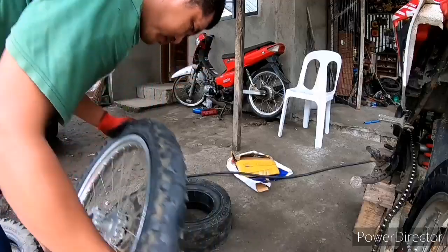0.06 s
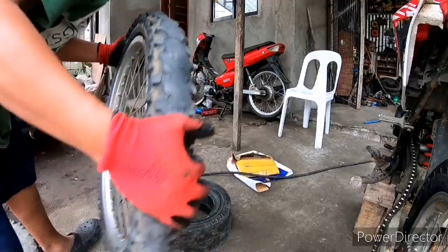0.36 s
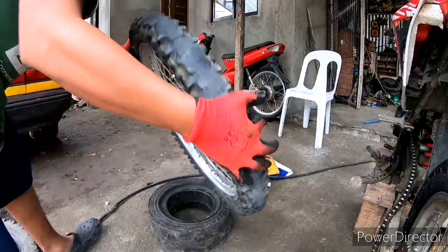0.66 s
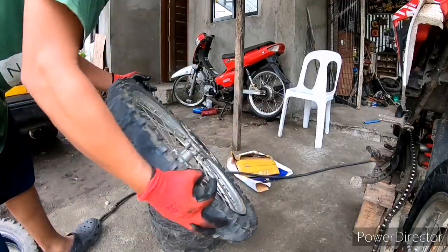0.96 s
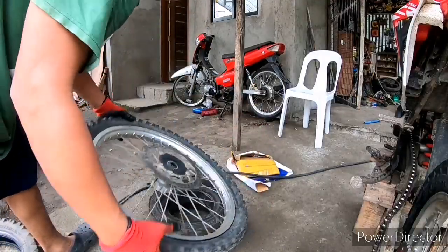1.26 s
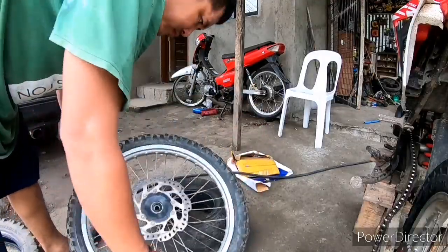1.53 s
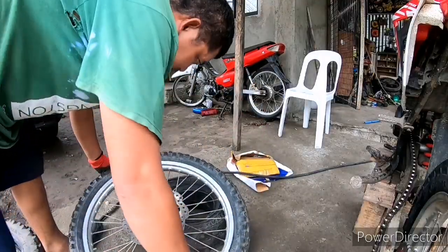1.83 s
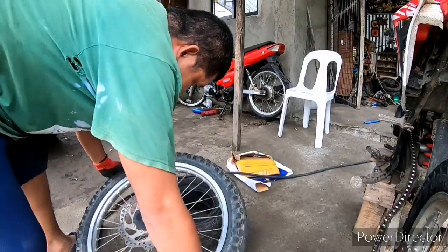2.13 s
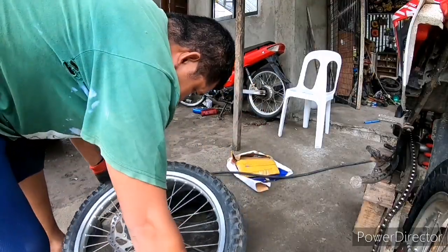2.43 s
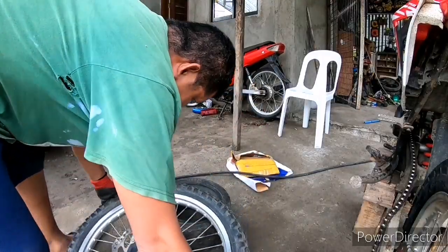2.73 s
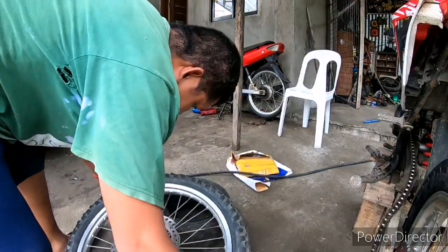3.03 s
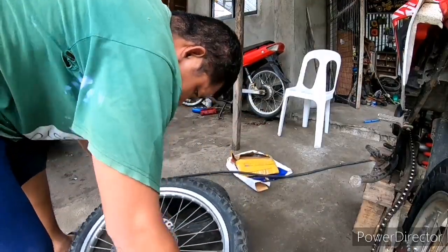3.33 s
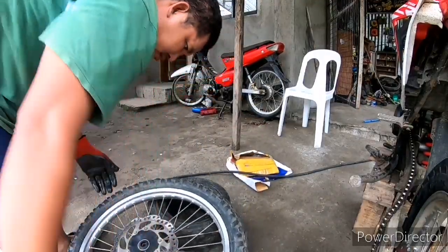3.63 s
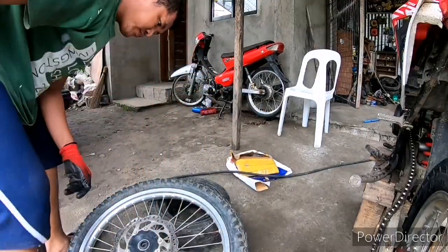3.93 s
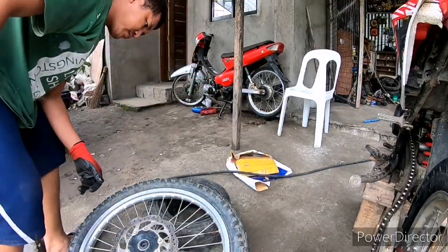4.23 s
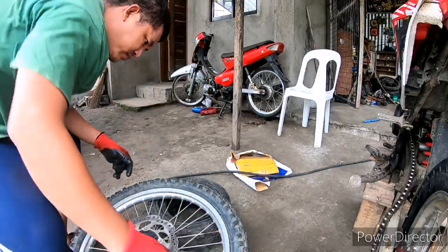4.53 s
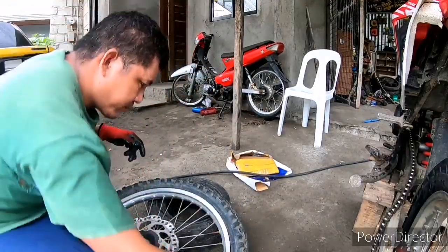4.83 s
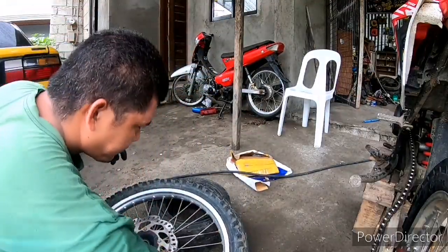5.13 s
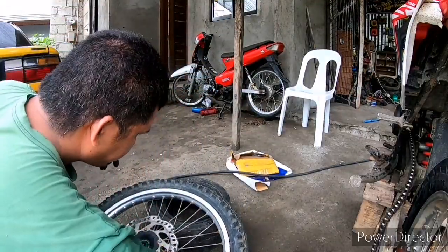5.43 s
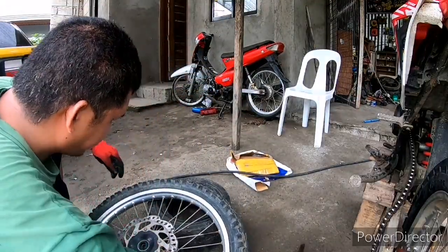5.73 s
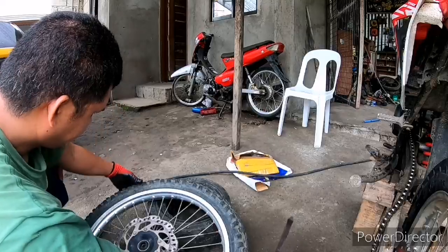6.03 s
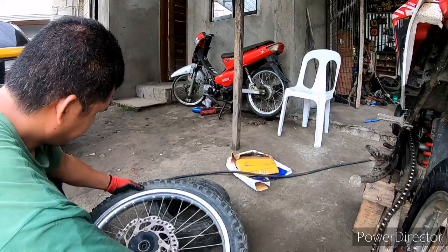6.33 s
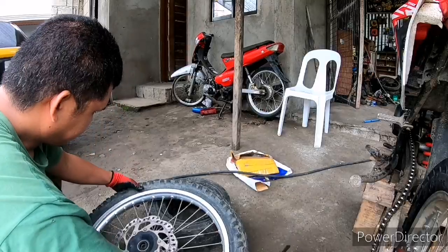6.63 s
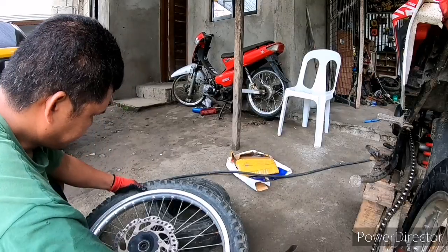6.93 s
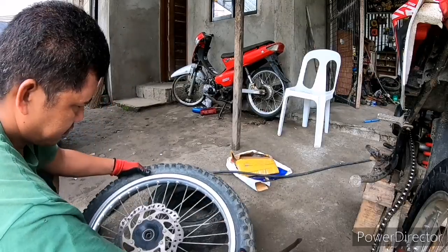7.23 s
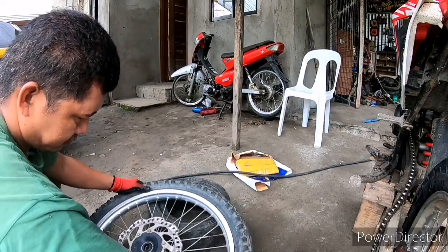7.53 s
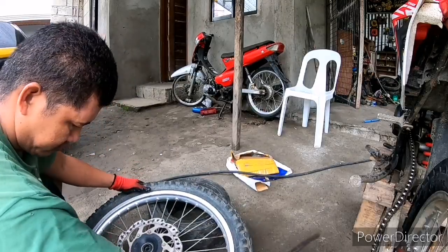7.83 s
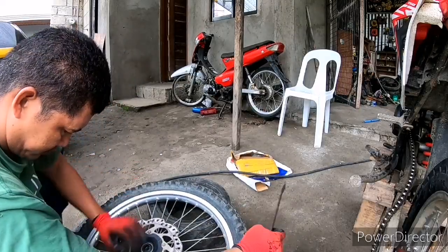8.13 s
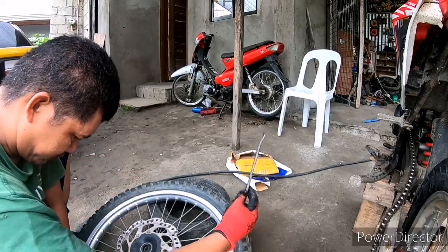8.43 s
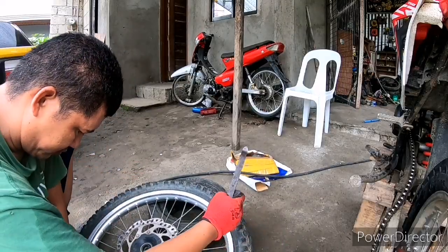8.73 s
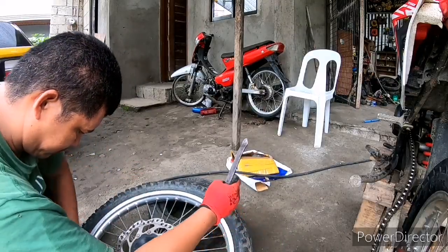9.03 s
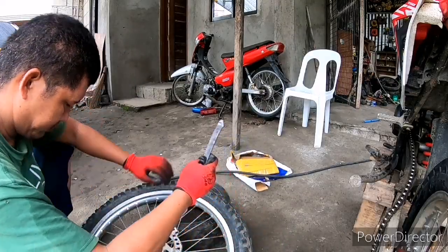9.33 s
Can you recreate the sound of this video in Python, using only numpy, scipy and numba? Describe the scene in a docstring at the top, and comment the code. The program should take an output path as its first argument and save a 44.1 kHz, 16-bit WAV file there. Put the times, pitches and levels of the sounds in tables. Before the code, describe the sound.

Steel tire levers ring on a motorcycle wheel's rim and brake disc over a thumping idle that slowly fades.

```python
"""Tire levers in a workshop yard

A motorcycle wheel is laid down between concrete walls, before a stereo microphone. Steel tire levers
are picked up and clink and slide on its rim and brake disc, each contact ringing the metal's modes.
Close by, a single-cylinder engine thumps through its silencer at idle, then speeds up a little and
fades, while street hiss and a light ticking grow in the background."""
import sys
import numpy as np
from scipy import signal
from scipy.fft import rfft, irfft, next_fast_len
from scipy.io import wavfile
from scipy.ndimage import uniform_filter1d, map_coordinates
from numba import njit

SR = 44100
rng = np.random.default_rng(int(sys.argv[2]) if len(sys.argv) > 2 else 0)


def master_out(mix):
    """Clip the mix to full scale and print it as 16-bit PCM to the path in sys.argv[1]."""
    frames = np.transpose(np.atleast_2d(mix))
    ceiling = np.clip(frames, -1, 1)
    pcm = np.round(ceiling * 32767).astype(np.int16)
    wavfile.write(sys.argv[1], SR, pcm)


N = 413658

# modes of a free lever: f/Hz, level/dB, t60/s, left minus right/dB
LEVER_MODES = [(1945, -3, .5, 0), (3160, -3, .12, -3), (3483, -1, .24, -2.5), (4601, 2.5, .24, -4),
               (5885, -6, .75, -8), (6257, 2, .25, -15), (8051, 3, .19, 0), (8856, -14, .5, -4),
               (9303, -16, .39, 4), (9820, -15, .3, -8), (10104, -10, .42, -8), (11900, -17, .4, -8),
               (12250, -18, .35, -8), (13900, -12, .35, -10), (14320, -14, .35, -6)]
# blows: t/s, ring/dB, band centre/Hz, spread/octaves, scuff/dB
LEVER_BLOWS = [(1.781, -35.5, 2000, .3, -55), (1.786, -33, 3900, .45, -56), (1.857, -43, 7000, .7, -41),
               (1.880, -22.5, 7900, .36, -33), (1.884, -24.5, 4600, .22, -41), (1.931, -25, 6200, .12, -40),
               (1.966, -33, 9300, .12, -44), (1.978, -39, 4600, .9, -31), (2.000, -45, 6500, .4, -37),
               (2.036, -34, 6400, .1, -50), (3.199, -28, 9820, .02, -58)]
# slides: t/s, length/s, ring/dB, band centre/Hz, spread/octaves, scuff/dB
LEVER_SCRAPES = [(1.675, .07, -42.5, 3520, .14, -60), (1.775, .09, -45, 6000, .6, -51),
                 (1.87, .1, -42, 6050, .2, -42), (1.87, .12, -41, 3100, .12, -46),
                 (2.0, .135, -47, 5000, .45, -51), (6.96, .3, -49, 10200, .1, -72)]


def lever():
    """Steel tire levers clink and ring brightly, mostly right of the microphone."""
    return struck(LEVER_MODES, LEVER_BLOWS + chatter(LEVER_SCRAPES), scuff_t60=.21,
                  waver_db=2.3, drift_rad=.35, scuff_lean_db=-4, port_rad=.35)


# modes, blows and slides of a gripped lever: columns as for the free lever
HELD_MODES = [(2915, -6, .09, -2), (3112, -2, .11, -2), (3365, 2, .14, -3), (4590, 2, .2, -3),
              (5930, -7, .2, -10), (6270, 0, .2, -12), (8080, 1, .2, -3), (8856, -12, .16, -10),
              (9303, -13, .16, 4), (9750, -14, .16, -8), (10200, -13, .16, -14), (12250, -14, .16, -8)]
HELD_BLOWS = [(5.663, -36.5, 6000, .9, -35), (5.678, -46, 6000, .7, -41)]
HELD_SCRAPES = [(5.505, .09, -53, 5200, .3, -56), (5.61, .055, -52, 3350, .15, -59),
                (5.66, .055, -41, 3080, .12, -46), (5.685, .04, -42, 4560, .1, -52),
                (5.665, .06, -41, 6200, .14, -44)]
# its pitch: t/s, bend/percent
HELD_BEND = [(5.52, 1.9), (5.59, 1.1), (5.65, -0.22), (5.70, -0.62), (5.76, -0.7)]


def held_lever():
    """A lever damped by the glove rings briefly; its pitch sinks as it is pressed home."""
    return struck(HELD_MODES, HELD_BLOWS + chatter(HELD_SCRAPES), scuff_t60=.12, waver_db=3.5,
                  drift_rad=1.3, scuff_lean_db=-5, port_rad=.75, bend_percent=curves(HELD_BEND)[0])


# modes, blows and slides of the brake disc: columns as for the free lever
DISC_MODES = [(2680, -1.5, .3, -1), (2980, 0, .14, -4), (3200, 1, .2, -2), (3345, -6, .15, -4),
              (3521, -13, .3, 0), (3815, -3, .27, 4), (4204, -7, .18, 0), (4689, -7, .3, 2),
              (5033, -4, .2, -2), (5523, -4, .14, -8), (6056, -13, .2, -9), (6693, 1, .25, -24),
              (9670, -4, .3, -14), (10390, -7, .25, -12), (14340, -6, .25, -3)]
DISC_BLOWS = [(2.8918, -28, 4600, .6, -19.5), (2.897, -30.5, 3120, 0.27, -20.5),
              (3.284, -33.5, 3310, 0.095, -42), (3.377, -42, 3330, 0.06, -44)]
DISC_SCRAPES = [(2.895, .045, -37, 7400, .27, -54), (3.17, .08, -55, 3130, .05, -60),
                (3.16, .08, -60, 6693, .1, -66), (7.305, .05, -44.5, 2690, .05, -64),
                (7.35, .035, -43, 4204, .04, -54), (7.33, .09, -56, 9300, .35, -62),
                (7.555, .085, -59, 3200, .22, -44)]


def brake_disc():
    """The steel plate chimes in closely spaced modes under the lever."""
    return struck(DISC_MODES, DISC_BLOWS + chatter(DISC_SCRAPES), scuff_t60=.2,
                  waver_db=2.2, drift_rad=.7, scuff_lean_db=-3, port_rad=-.48)


# modes, blows and slides of the rim: columns as for the free lever
RIM_MODES = [(813, 11, 0.081, 2), (1283, 10.5, 0.1, -5), (1600, 3, 0.075, -4.5), (1830, -10.5, 0.042, -8),
             (2440, -3.5, 0.045, 0.5), (3490, 3, 0.035, 0), (5060, 4.5, 0.025, -10), (6160, 2, 0.029, -28),
             (8260, -3.5, 0.051, -12), (9700, -8.5, .04, -10)]
RIM_BLOWS = [(0.338, -65.5, 6450, 0.28, -36), (0.706, -60, 1200, 0.78, -43), (1.294, -49.5, 2370, 1.6, -36),
             (1.631, -25.5, 4600, 1.04, -29), (1.653, -65, 1590, 0.57, -33.5),
             (1.779, -65, 1290, 0.79, -23.5), (2.847, -47, 4970, 0.8, -38), (2.862, -45, 6000, 1, -44),
             (3.198, -59, 4000, 2.1, -42.5), (3.285, -60, 3500, 0.63, -42)]
RIM_SCRAPES = [(1.88, .12, -55, 1500, .8, -43), (2.848, .075, -54, 1400, .55, -36),
               (7.34, .055, -64, 1700, 1.3, -40), (7.65, .08, -64, 1400, .98, -45)]


def rim():
    """The rim clanks: its modes start lower and die quickly."""
    return struck(RIM_MODES, RIM_BLOWS + chatter(RIM_SCRAPES), scuff_t60=.16,
                  waver_db=4, drift_rad=.72, scuff_lean_db=-3.5, port_rad=.9)


# modes and blows of the hub: columns as for the free lever
HUB_MODES = [(803, 0, .07, 0), (1050, -3, .05, 0), (1406, -4, .029, 0), (1490, -3, .076, 0),
             (1757, 4.5, .045, .6), (1890, -1, .04, 0)]
HUB_BLOWS = [(2.847, -21, 1910, 0.36, -39), (2.8707, -25, 1770, 0.64, -23), (2.879, -31, 1180, 0.46, -18),
             (2.903, -30, 1180, 0.41, -30), (2.915, -23.5, 1430, 0.1, -28.5)]


def hub():
    """A quick cluster of blows on well-damped modes makes one dull clatter."""
    return struck(HUB_MODES, HUB_BLOWS, scuff_t60=.062,
                  waver_db=3, drift_rad=.81, scuff_lean_db=1.5, port_rad=2)


def struck(modes, hits, scuff_t60, waver_db, drift_rad, scuff_lean_db, port_rad, bend_percent=0):
    """Contacts feed energy into a steel part's modes; where and how hard they touch selects the band."""
    starts, ring_db, centre_hz, spread, _ = np.transpose(hits)
    onsets = np.round(starts * SR).astype(int)
    ports = np.array([[.5], [-.5]]) * port_rad  # phase at the two microphone ports
    t, out = np.arange(N) / SR, np.zeros((2, N))
    bent_time = t + np.cumsum(bend_percent * np.ones(N)) / (100 * SR)
    for hz, db, t60, lean_db in modes:
        fed = np.bincount(onsets, (amp(ring_db + db) * band(hz, centre_hz, spread)) ** 2, N)
        energy = signal.lfilter([1], [1, -amp(-120 / (t60 * SR))], fed + 1e-20)
        live = np.flatnonzero(energy > 1e-11)
        envelope = uniform_filter1d(np.sqrt(energy), size=64)[live]
        # the shifting grip makes each ring waver in level and phase
        phase = 2 * np.pi * hz * bent_time[live] + drift_rad * wobble(70, live)
        waver = amp(waver_db * wobble(45, live))
        out[:, live] += envelope * waver * np.sin(phase + ports) * panned(lean_db)
    age, lead_samples = t[:SR // 5], 64
    for start, _, centre, octaves, db in hits:
        # the scuff: a sharp crack, then a short wash of dense high modes
        noise = rng.standard_normal(len(age)) + .25 * rng.standard_normal((2, len(age)))
        fade = amp(-60 * age / .027) + .25 * amp(-60 * age / scuff_t60)
        burst = np.pad(noise * fade, ((0, 0), (lead_samples, 0)))
        rolloff = lambda hz: lowpass(hz, 9800, 14) / np.sqrt(1 + hz / centre)
        colour = lambda hz: np.exp(1j * ports) * band(hz, centre, octaves) * rolloff(hz)
        scuff = filtered(burst, colour) / filtered(noise, colour).std()
        add(out, start - lead_samples / SR, amp(db) * scuff * panned(scuff_lean_db))
    return out


def chatter(slides, scatter_db=3.2, count=13):
    """Sliding steel sticks and slips: a run of light, uneven contacts that swells and fades."""
    contacts = []
    for start, length, ring_db, hz, spread, scuff_db in slides:
        progress = (np.arange(count) + rng.random(count)) / count
        swell_db = 20 * np.log10(np.sin(np.pi * progress) + 1e-6)
        sizes_db = swell_db + scatter_db * rng.standard_normal(count)
        for when, db in zip(start + length * progress, sizes_db):
            contacts.append((when, ring_db + db, hz, spread, scuff_db + db))
    return contacts


# the tire meets the ground: t/s, level/dB, f/Hz
TIRE_BUMPS = [(1.634, -15.5, 233), (3.285, -24, 212)]


def tire_thuds(t60=.17, attack_s=.0019):
    """The air-filled rubber gives one short low note at each bump."""
    out, t = np.zeros(N), np.arange(SR // 4) / SR
    for start, db, hz in TIRE_BUMPS:
        envelope = amp(db - 60 * t / t60) * (1 - np.exp(-t / attack_s))
        add(out, start, envelope * np.sin(2 * np.pi * hz * t))
    return out


# soft rubs: middle t/s, half length/s, band centre/Hz, spread/octaves, level/dB
RUB_STROKES = [(4.343, 0.013, 7000, 0.59, -55), (4.433, .04, 1900, .6, -51), (4.533, .028, 3280, 0.35, -49),
               (7.541, 0.02, 1290, 0.39, -44), (7.583, 0.027, 5500, 0.78, -45.5),
               (7.696, 0.072, 1990, 1.34, -47.5)]


def rubs(grain_db=3):
    """Grainy friction of glove, sandal and tire swells and fades without a blow."""
    out, t = np.zeros(N), np.arange(-SR // 4, SR // 4) / SR
    for middle, half, centre, spread, db in RUB_STROKES:
        noise = rng.standard_normal(len(t))
        grain = amp(grain_db * unit(uniform_filter1d(rng.standard_normal(len(t)), size=128)))
        friction = filtered(noise * grain, lambda hz: band(hz, centre, spread) * lowpass(hz, 9500, 14))
        add(out, middle + t[0], amp(db) * bell(t, half) * unit(friction))
    return out


# engine speed: t/s, firing rate/Hz
FIRING_RATE = [(0.0, 22.28), (0.4, 22.32), (1.2, 23.11), (2.4, 23.31), (2.9, 23.64), (4.0, 23.78),
               (4.55, 23.56), (5.5, 24.15), (7.25, 26.14), (8.55, 28.89), (8.9, 28.97), (9.38, 30.14)]


def engine():
    """One cylinder, close by: the exhaust valve barks, then the silencer's low harmonics swell."""
    speed, = curves(FIRING_RATE)
    cycles = np.cumsum(speed) / SR
    boom = silencer_boom(cycles, speed)
    barks = exhaust_barks(cycles, speed)
    # wall echoes fill the gaps between barks and widen the engine a little
    barks = reflected(.69 * barks + .43 * yard(barks[None])[0])
    side = yard((amp(-30) * boom + amp(-22) * barks)[None])[0]
    return (amp(-2) * boom + barks) * panned(-.18) + np.array([side, -side])


# the exhaust's low note: t/s, relative level/dB, centre of a lifted band/Hz, lift/dB
BOOM_COURSE = [(0, -31, 96.3, 14.5), (.45, -23, 124.5, 2.5), (.9, -27, 136.6, 11), (1.5, -30.5, 162.6, 19),
               (2.1, -29.5, 168, 15), (2.8, -35, 139.4, 7.5), (3.25, -28.5, 161, 11.5),
               (3.7, -29, 154.5, 7), (4.35, -26, 144, 7), (5.2, -25.5, 162.6, 9.5), (6.2, -24, 185, 1),
               (7.1, -27.5, 184, 2.5), (7.7, -28, 152, 9.5), (8.6, -32, 158, 12.5), (9.38, -39.5, 178, 15)]
# the silencer's low response: f/Hz, gain/dB
SILENCER_RESPONSE = [(45, -20.5), (68, -30.5), (90, 4.5), (115, 2), (165, -6.5), (185, -10), (215, -36)]


def silencer_boom(cycles, speed, lag_cycles=.1793, waver_db=1.5, lift_width_hz=10.5, dispersion_rad=.49):
    """Harmonics 2 to 8 of the firing rate add up to a thump; the higher ones run ahead and smear it."""
    level_db, lift_hz, lift_db = curves(BOOM_COURSE)
    boom = np.zeros(N)
    for order in range(2, 9):
        hz = order * speed
        db = level_db + along(SILENCER_RESPONSE, hz) + lift_db * bell(hz - lift_hz, lift_width_hz)
        phase = 2 * np.pi * order * (cycles - lag_cycles) + dispersion_rad * (order - 4) * (order - 5)
        boom += np.sqrt(2) * amp(db + waver_db * wobble(14)) * np.cos(phase)
    return boom


# the exhaust's bark: t/s, relative level/dB, strongest band/Hz
BARK_COURSE = [(0, -32, 377), (1.4, -40, 351), (2.1, -40.5, 362), (2.9, -37.5, 398), (3.7, -31.5, 361.6),
               (4.9, -33.5, 377), (5.8, -39.5, 355), (7.3, -41, 393), (9.38, -54.5, 381)]
# resonances of the silencer and of the pipe: f/Hz, width/Hz, gain/dB
SILENCER_MODES = [(194, 29, -0.5), (236.4, 61, -1), (279.4, 57.4, 1)]
PIPE_MODES = [(491, 28, 13.5), (566, 150, -16.5)]
JITTER_CYCLES = .005  # unevenness of the firings


def exhaust_barks(cycles, speed, lag_cycles=.76, chamber_width_hz=85.6, puff_db_per_hz=1.53):
    """Each opening of the exhaust valve rings the chambers, the silencer and the pipe."""
    bark_db, bark_hz = curves(BARK_COURSE)
    valve = cycles - lag_cycles + JITTER_CYCLES * wobble(18)
    # two chambers in series round off each bark
    chamber = lambda x: gliding_resonance(x, bark_hz, chamber_width_hz, SR)
    bark = amp(bark_db) * firings(valve, lambda x: chamber(chamber(x)), rough=.33)
    # the puff gains on the bark with speed; the overtone follows the bark only in part
    puff_db = bark_db + .5 + puff_db_per_hz * (speed - speed[0])
    puff = amp(puff_db) * firings(valve, lambda x: resonate(x, SILENCER_MODES), rough=.3)
    overtone = amp(.33 * bark_db - 33.5) * firings(valve, lambda x: resonate(x, PIPE_MODES), rough=.81)
    return puff + bark + overtone


def firings(cycles, body, rough):
    """Each firing is a pressure step with a gush of turbulent gas, ringing the given body."""
    gush = rng.standard_normal(N) * np.exp(-(cycles % 1) / .3)
    ringing = unit(body(pulses(cycles, scatter_db=.8))) + rough * unit(body(gush))
    return unit(filtered(ringing, lambda hz: lowpass(hz, 700, 8) / (1 + (170 / (hz + 1)) ** 8)))


# a shifting reflection of the barks: t/s, delay/s
REFLECTION_DELAY = [(0.35, .0097), (1.1, 0.0074), (1.9, 0.0062), (2.7, 0.0076), (3.5, 0.0092),
                    (4.5, 0.0087), (5.9, 0.00892), (7.3, 0.0089), (8.4, 0.0088)]


def reflected(x, gain=.5):
    """A late copy reaches the microphone; as its delay shifts, harmonics swell and drop out."""
    samples = np.arange(N)
    copy = np.interp(samples - curves(REFLECTION_DELAY)[0] * SR, samples, x)
    return (x + gain * copy) / np.hypot(1, gain)


# swells of a narrow drone: middle t/s, half length/s, f/Hz, glide/(Hz/s), level/dB
DRONE_SWELLS = [(2.1, .27, 366, 48, -36), (2.8, .33, 410, 48, -34.5), (4.26, .1, 672, -2, -47),
                (4.6, .4, 410, 25, -38.5), (4.95, .35, 520, 15, -46), (5.605, .45, 645, -1.5, -53),
                (6.0, .35, 345, 20, -41), (9.0, .4, 636, -35, -48.5), (2.1, .25, 527, 35, -47)]


def drone(width_hz=42., rough=.7, wander_hz=5):
    """The firings sound narrow resonances that swell, glide and fade above the engine."""
    t, out = np.arange(N) / SR, np.zeros(N)
    cycles = np.cumsum(curves(FIRING_RATE)[0]) / SR + JITTER_CYCLES * wobble(18)
    drive = unit(pulses(cycles, scatter_db=.5)) + rough * rng.standard_normal(N)
    wander = wander_hz * wobble(6)
    for middle, half, hz, glide, db in DRONE_SWELLS:
        ring = lambda x: gliding_resonance(x, hz + glide * (t - middle) + wander, width_hz, SR)
        out += amp(db) * bell(t - middle, half) * unit(ring(ring(drive)))
    return out


# the street's noise bands, low to high: f/Hz, relative density/dB
RUMBLE_BAND = [(15, -14.5), (30, -4.5), (44, 5), (65, 0), (100, -12), (200, -41.5), (500, -110)]
ROAR_BAND = [(20, -62), (45, -26.5), (80, 2.5), (115, 2.5), (200, -3), (310, -8.5), (450, -24.5),
             (900, -110)]
WASH_BAND = [(250, 4.5), (520, 3), (680, 2.5), (900, -2.5), (1250, -1.5), (1600, -5.5), (2300, -5),
             (2800, -26), (3600, -61)]
RUSTLE_BAND = [(2000, -15.5), (2700, -1.5), (3100, -1), (3800, -1), (4400, -4.5), (5500, -10), (6300, -35)]
HISS_BAND = [(3700, -4.5), (4700, -1.5), (5600, 3.5), (6600, 2.5), (7400, -5.5), (9000, -49)]
SIZZLE_BAND = [(5500, -84), (7000, -19.5), (7600, -5.5), (8050, -1), (8450, -10), (8900, -27),
               (10500, -79.5)]
FIZZ_BAND = [(6000, -27), (7500, 1), (8200, -2), (10000, -2.5), (11200, -17.5), (12500, -14.5),
             (14500, -39), (16000, -62)]
# low levels: t/s, rumble/dB, roar/dB
LOW_LEVELS = [(0, -36, -28), (1.2, -40, -36), (2.0, -41, -29.5), (2.7, -39.5, -29.5), (3.5, -31.5, -24.5),
              (4.3, -36.5, -27), (5.4, -43.5, -42.5), (6.7, -43, -37), (7.5, -44, -33), (8.15, -39, -34),
              (8.8, -58, -35), (9.38, -42, -31.5)]
# relative upper levels: t/s, wash/dB, rustle/dB, treble/dB
UPPER_LEVELS = [(0, -44, -57.5, -50.5), (0.6, -44, -58.5, -54), (1.2, -49.5, -59, -56.5),
                (2.8, -49, -60, -57.5), (3.5, -48, -55.5, -64.5), (4.3, -45, -55, -63.5),
                (4.9, -48.5, -56, -63.5), (6.5, -51.5, -60.5, -58.5), (7.1, -47.5, -55, -52.5),
                (8.5, -45, -49.5, -51), (9.38, -42, -45.5, -44.5)]
# a thin, narrow hiss midway: t/s, level/dB
SIZZLE_SWELL = [(3.2, -90), (3.7, -67), (4.55, -64), (5.3, -79), (6.2, -87)]


def street():
    """Low rumble and the wash of the street, heard from the yard, brighten toward the end."""
    wash_db, rustle_db, treble_db = curves(UPPER_LEVELS)
    rumble_db, roar_db = curves(LOW_LEVELS)
    rumble = amp(rumble_db) * rush(RUMBLE_BAND, patchy_db=1)
    roar = amp(roar_db) * rush(ROAR_BAND, patchy_db=1.2)
    sizzle = amp(curves(SIZZLE_SWELL)[0]) * rush(SIZZLE_BAND, patchy_db=2.2)
    wash = amp(wash_db + 4) * rush(WASH_BAND, patchy_db=1.5)
    rustle = amp(rustle_db + 3) * rush(RUSTLE_BAND, patchy_db=1.4)
    hiss = amp(treble_db + 2.5) * rush(HISS_BAND, patchy_db=1.4)
    fizz = amp(treble_db - 5) * rush(FIZZ_BAND, patchy_db=1.4)
    return rumble + roar + sizzle + wash + rustle + hiss + fizz


# street noise at the microphone: f/Hz, left-right correlation
STEREO_LIKENESS = [(30, 0.71), (70, 0.99), (130, 0.99), (290, 0.99), (640, 0.79), (1410, 0.43),
                   (3100, 0.85), (6820, 0.017), (15000, 0.02)]


def rush(spectrum, patchy_db):
    """Stereo noise of rms 1 with patches of random gain in time and frequency."""
    cells = signal.stft(rng.standard_normal((2, N)), nperseg=512)[2]
    patches = uniform_filter1d(rng.standard_normal(cells.shape[1:]), size=5, axis=0)
    patches = unit(uniform_filter1d(patches, size=14, axis=1))
    pair = signal.istft(cells * amp(patchy_db * patches), nperseg=512)[1][:, :N]
    angle = lambda hz: np.arccos(np.clip(along(STEREO_LIKENESS, hz), -1, 1)) / 2
    colour = lambda hz: amp(along(spectrum, hz)) * [np.cos(angle(hz)), np.sin(angle(hz))]
    mid, side = filtered(pair, colour)
    return unit(np.array([mid + side, mid - side]))


# ticking near the end: t/s, relative level/dB
TICK_SWELL = [(7.6, -70.5), (7.95, -35), (8.3, -31.5), (8.65, -30), (9.38, -46)]


def ticking(rate_hz=16.5, width_hz=900):
    """Light regular ticks in pairs, like the valve gear of an engine out in the street."""
    cycles, out = np.arange(N) / SR * rate_hz, np.zeros((2, N))
    for lag_cycles, hz, gain in [(.12, 8250, 1), (.404, 6200, 1.35)]:
        bursts = rng.standard_normal((2, N)) * np.exp(-((cycles - lag_cycles) % 1) / .066)
        mode = [(hz, width_hz, 0)]
        out += gain * unit(resonate(resonate(bursts, mode), mode))
    return amp(curves(TICK_SWELL)[0] - 25) * out


# the yard's reverberation: f/Hz, t60/s
YARD_DECAY = [(200, 0.32), (2000, 0.39), (10000, 0.38)]


def yard(x):
    """Concrete walls answer after 6 ms; each frequency dies at its own speed."""
    hz, t, cells = signal.stft(rng.standard_normal((2, SR // 2)), SR, nperseg=256)
    decay = amp(-60 * t / along(YARD_DECAY, hz)[:, None]) * (t > .006)
    tail = signal.istft(cells * decay, SR, nperseg=256)[1]
    return signal.fftconvolve(x, tail / np.linalg.norm(tail[0]), axes=1)[:, :N]


def amp(db):
    """Decibels to gain."""
    return 10 ** (np.asarray(db) / 20)


def unit(x):
    """Scale to rms 1."""
    return x / np.sqrt(np.mean(x ** 2) + 1e-20)


def bell(offset, width):
    """A Gaussian of height 1."""
    return np.exp(-.5 * (offset / width) ** 2)


def band(hz, centre, octaves):
    """A bell of gain around a centre frequency."""
    return bell(np.log2((hz + 1) / centre), octaves)


def lowpass(hz, corner, order):
    """Gain that falls away above a corner frequency."""
    return 1 / (1 + (hz / corner) ** order)


def along(points, hz):
    """Interpolate (f/Hz, value) points on a log axis."""
    knots_hz, values = np.transpose(points)
    return np.interp(np.log(hz + 1), np.log(knots_hz + 1), values)


def curves(rows):
    """One value per sample for each column after the time."""
    times, *columns = np.transpose(rows)
    return [np.interp(np.arange(N) / SR, times, column) for column in columns]


def wobble(rate, samples=np.arange(N)):
    """A smooth random curve, rate knots a second, read at the given samples."""
    return map_coordinates(rng.standard_normal(int(N * rate / SR) + 4), [samples * rate / SR])


def pulses(cycles, scatter_db):
    """One pulse of uneven size each time the cycle count passes a whole number."""
    onsets = np.flatnonzero(np.diff(np.floor(cycles)) > 0)
    train = np.zeros(N)
    train[onsets] = amp(scatter_db * rng.standard_normal(len(onsets)))
    return train


def filtered(x, response):
    """x through a complex response of frequency."""
    n = x.shape[-1]
    padded = next_fast_len(n + 8192)
    return irfft(rfft(x, padded) * response(np.fft.rfftfreq(padded, 1 / SR)), padded)[..., :n]


def resonate(x, modes):
    """x through parallel (f/Hz, width/Hz, gain/dB) resonances of alternating sign."""
    return filtered(x, lambda f: sum(
        (-1) ** k * amp(db) * 1j * f * width / (hz * hz - f * f + 1j * f * width)
        for k, (hz, width, db) in enumerate(modes)))


@njit
def gliding_resonance(x, hz, width_hz, sr):
    """A damped oscillator whose centre frequency moves."""
    out, state = np.zeros(len(x)), 0j
    for i in range(len(x)):
        state = state * np.exp((2j * hz[i] - width_hz) * np.pi / sr) + x[i]
        out[i] = state.real
    return out


def add(track, start_s, sound):
    """Mix a sound into a track."""
    part = track[..., round(start_s * SR):][..., :sound.shape[-1]]
    part += sound[..., :part.shape[-1]]


def panned(lean_db):
    """Left and right gains with a mean of 1."""
    gains = amp([[lean_db / 2], [-lean_db / 2]])
    return gains / gains.mean()


def scene():
    """Steel on steel in the yard, the engine close by, the street behind."""
    steel = lever() + held_lever() + brake_disc() + rim() + hub()
    wheel_work = steel + amp(-10) * yard(steel) + tire_thuds() + rubs()
    return wheel_work + engine() + street() + drone() + ticking()


# stereo width: t/s, side gain/dB
IMAGE_WIDTH = [(2.95, 0.5), (3.25, -11), (3.6, -34), (4.7, -54), (4.85, -20.5), (5.5, -0.5)]


def record(dry, top_hz=14900):
    """At the microphone: the image closes to the centre and reopens; nothing above top_hz is kept."""
    mid = (dry[0] + dry[1]) / 2
    side = (dry[0] - dry[1]) / 2 * amp(curves(IMAGE_WIDTH)[0])
    return filtered(np.array([mid + side, mid - side]), lambda hz: hz < top_hz)


dry = scene()
out = record(dry)
master_out(out)
```